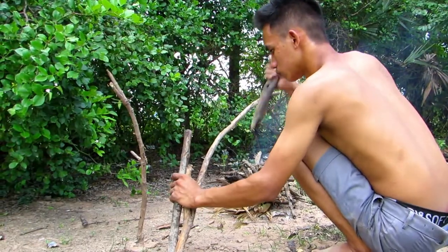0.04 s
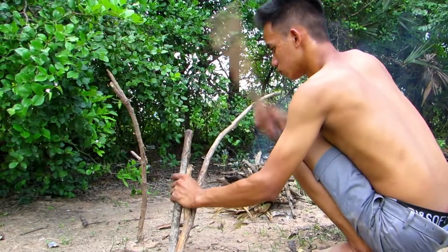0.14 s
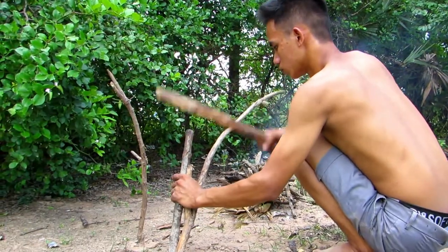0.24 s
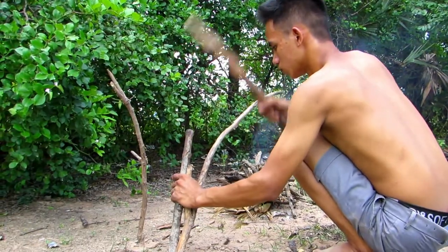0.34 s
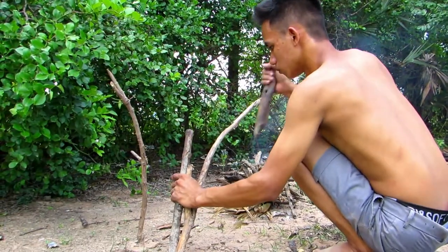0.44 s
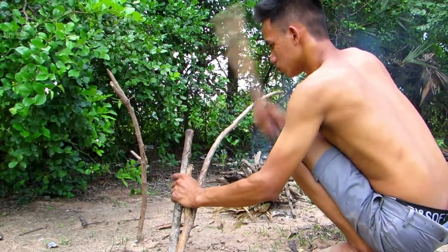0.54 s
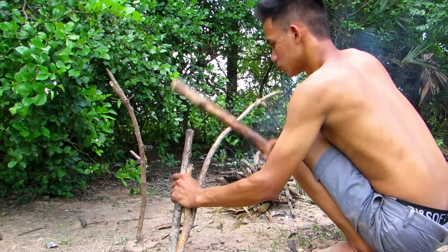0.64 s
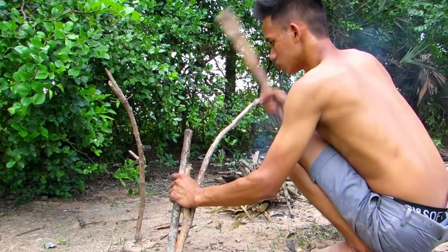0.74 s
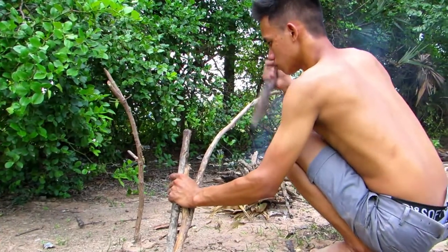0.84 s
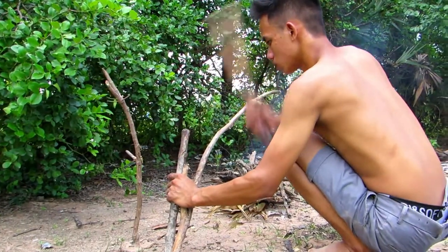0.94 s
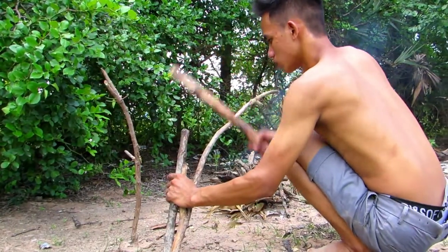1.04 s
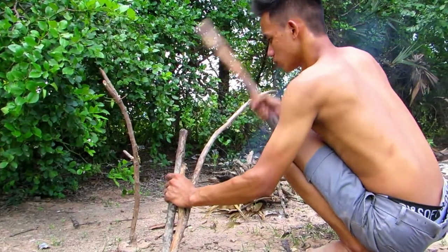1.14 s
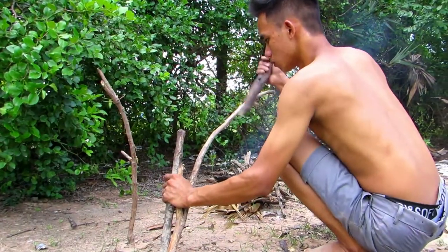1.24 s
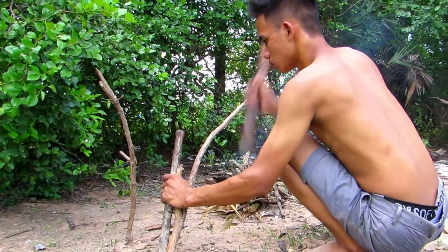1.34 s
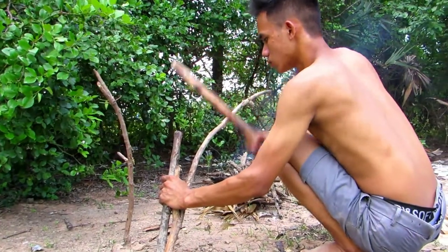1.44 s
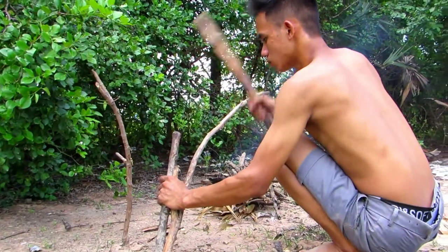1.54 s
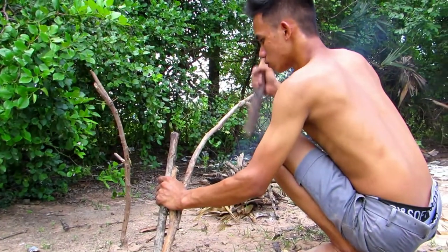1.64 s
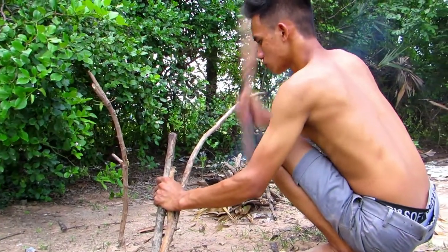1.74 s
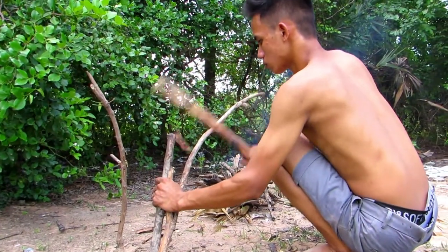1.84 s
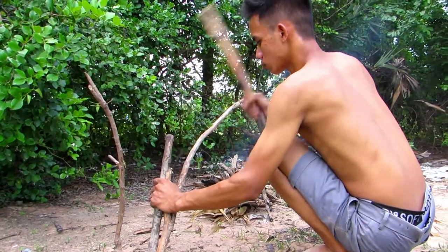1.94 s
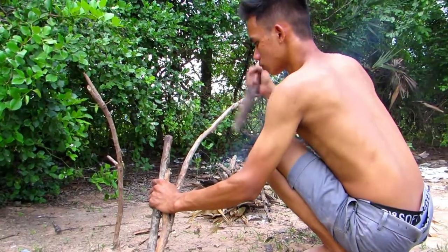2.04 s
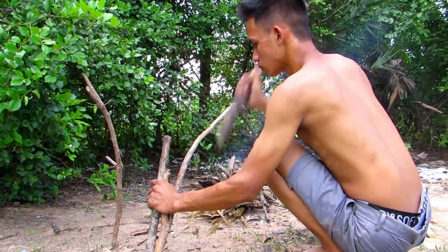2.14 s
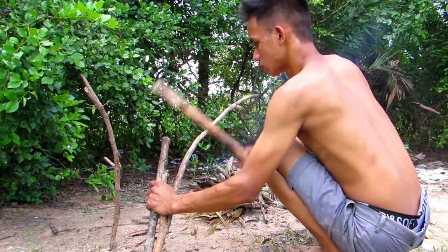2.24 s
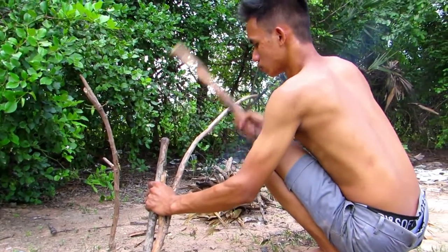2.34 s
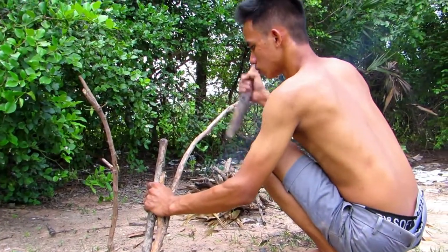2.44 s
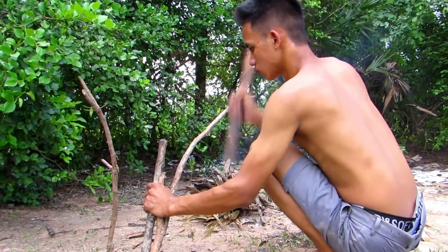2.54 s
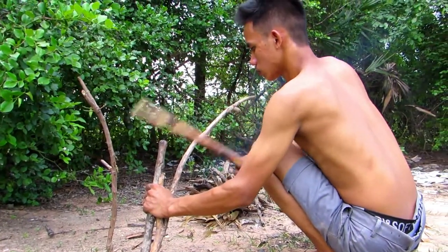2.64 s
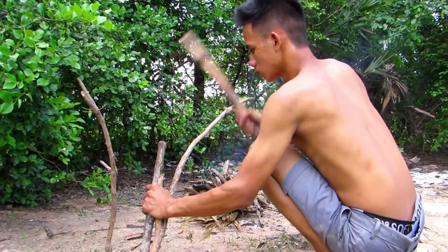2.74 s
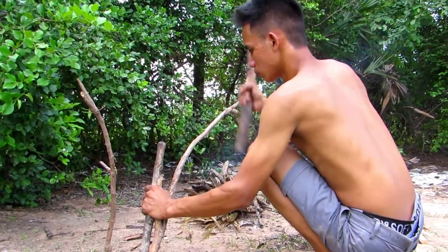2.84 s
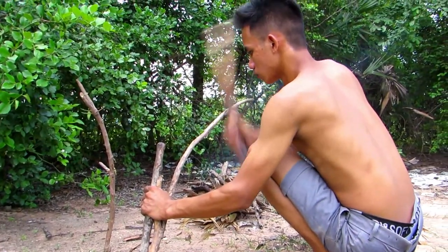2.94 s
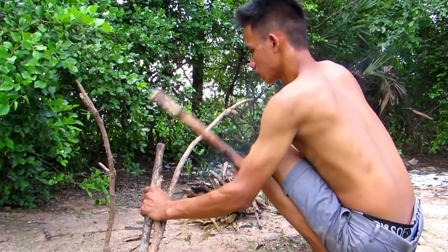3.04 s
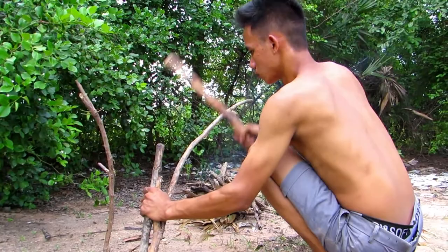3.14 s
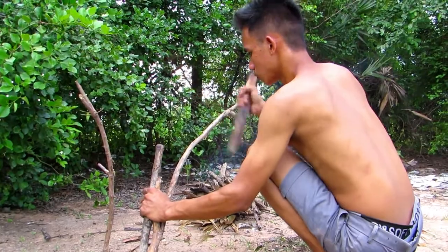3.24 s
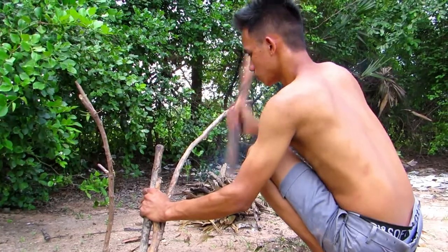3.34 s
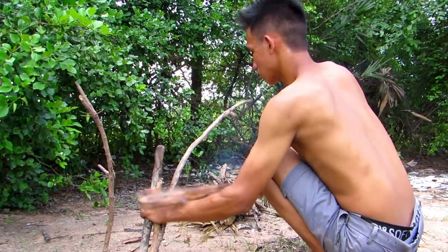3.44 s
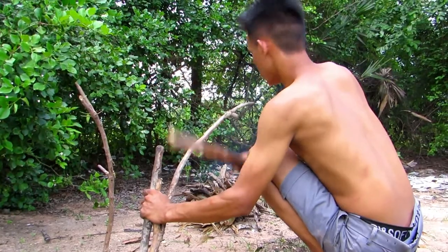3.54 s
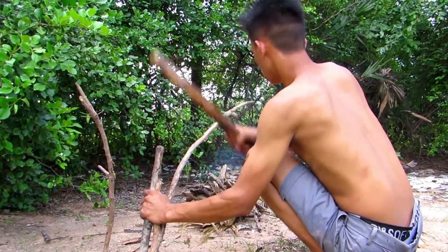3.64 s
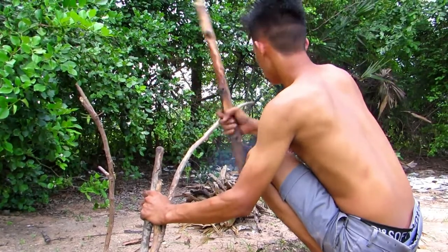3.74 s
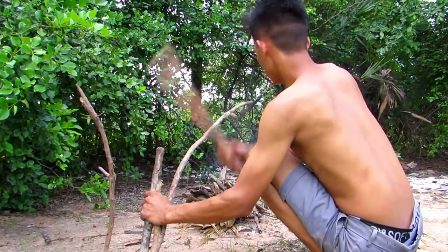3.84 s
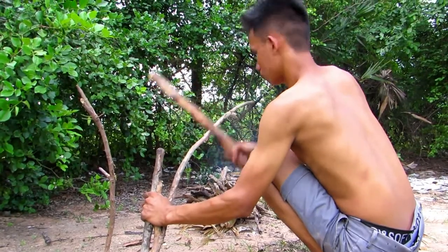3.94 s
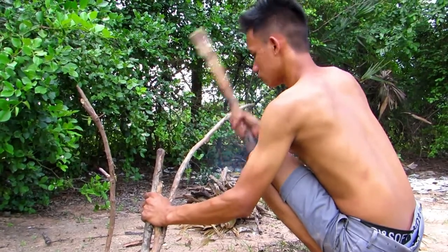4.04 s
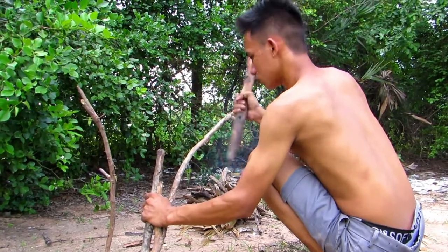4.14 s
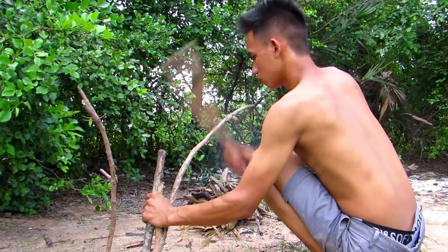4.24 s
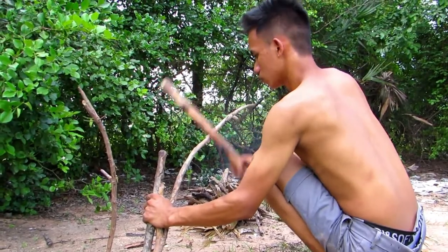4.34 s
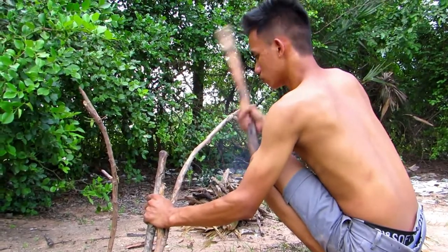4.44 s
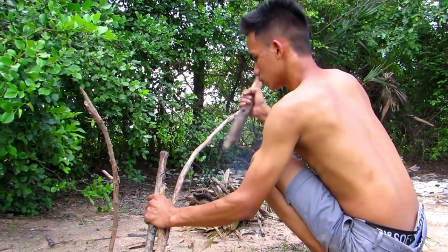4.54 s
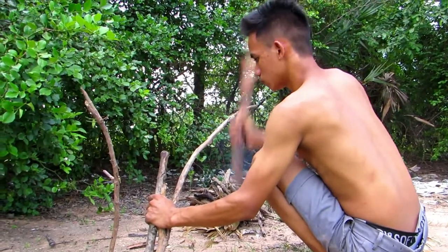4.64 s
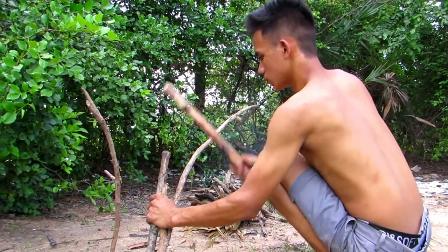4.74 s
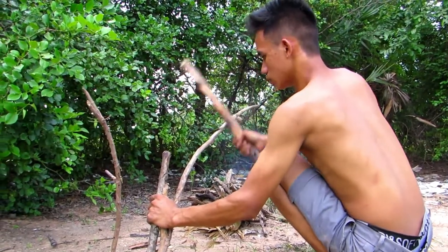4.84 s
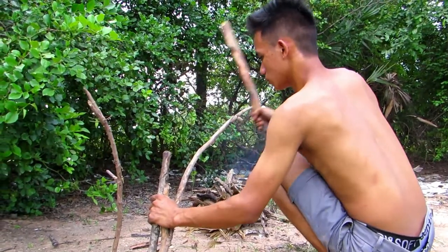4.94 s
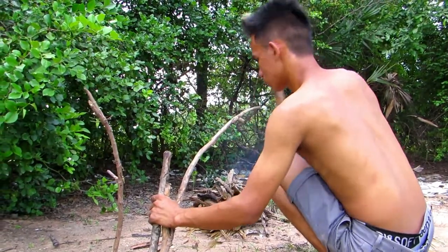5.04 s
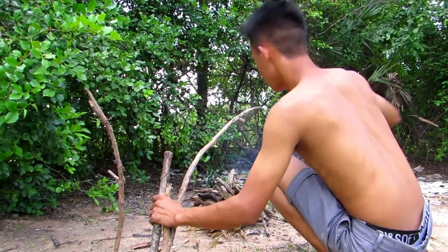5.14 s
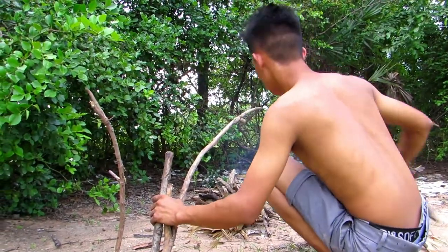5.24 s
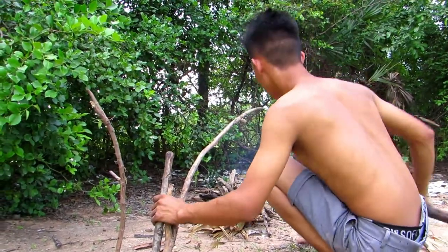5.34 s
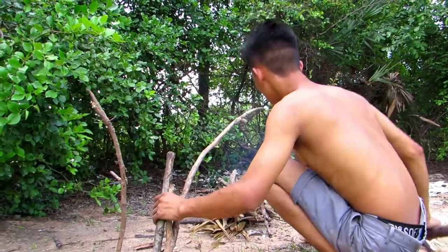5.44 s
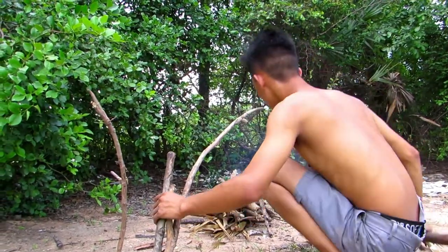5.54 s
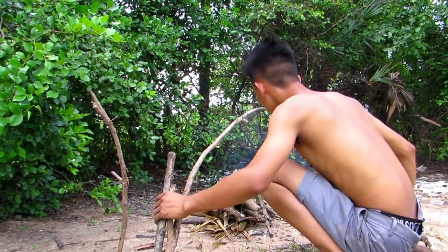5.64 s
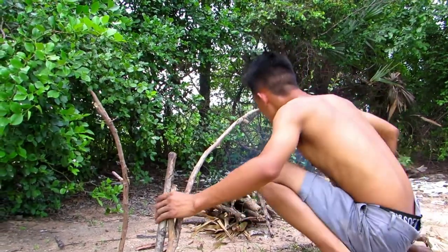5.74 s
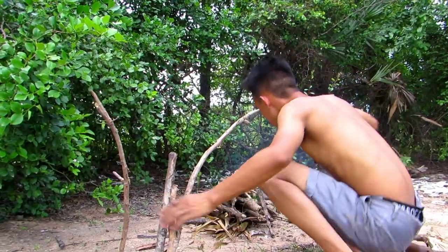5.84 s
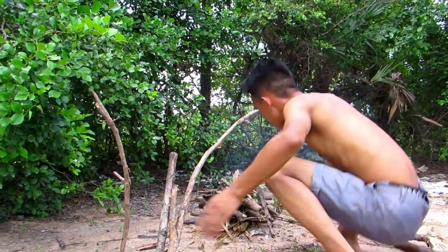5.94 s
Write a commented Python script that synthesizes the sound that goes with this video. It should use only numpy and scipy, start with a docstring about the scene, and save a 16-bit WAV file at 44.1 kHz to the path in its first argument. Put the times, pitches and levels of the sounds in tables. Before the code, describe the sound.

A stick pounds a wooden stake into packed dirt in twelve sharp, steady knocks, over low outdoor wind rumble and faint insects.

```python
"""Wind rumbles and now and then buffets the microphone, a faint hum fades and insects sing throughout.
From the start a stick drives a wooden stake into packed dirt: twelve knocks of contact noise and damped
modes, each scattered back by the bushes as noise and blurred notes. Then the stick drops and rings freely,
and feet bump the ground and stir dry litter. A limiter ducks everything after loud peaks.
"""
import sys
import numpy as np
from scipy import signal
from scipy.fft import rfft, irfft, next_fast_len
from scipy.io import wavfile
from scipy.ndimage import uniform_filter1d, minimum_filter1d

SR = 44100
rng = np.random.default_rng(int(sys.argv[2]) if len(sys.argv) > 2 else 0)


def waveform_to_disk(signal):
    """Save audio, clipped to [-1, 1], as 16-bit WAV at the path in sys.argv[1]."""
    frames = np.transpose(np.atleast_2d(signal))
    scaled = np.clip(frames, -1, 1) * 32767
    samples = np.round(scaled).astype(np.int16)
    wavfile.write(sys.argv[1], SR, samples)


N = 264159

# overall background swell: [t/s, level/dB]
BACKGROUND = [(0, 1), (1.4, 1.5), (2.7, 1), (3.5, -5), (4.2, -3), (5.0, -4), (5.99, -0.5)]
# colour of the low wind: [f/Hz, relative level/dB]
RUMBLE = [(22, -18.5), (33, -9), (45, 3), (65, -3.5), (90, -3.5), (125, -4.5), (170, -8), (240, -10.5),
          (340, -15), (500, -22.5), (900, -26), (4000, -76)]
# colour of the wash of leaves: [f/Hz, relative level/dB]
AIR = [(200, -29), (450, -6.5), (750, -7.5), (1200, 0.5), (1900, -2.5), (3750, -9.5), (3950, -16.5),
       (6500, -17), (8200, -25), (12000, -26), (14000, -42), (16000, -60)]
# colour of the rustling litter: [f/Hz, relative level/dB]
LITTER = [(2000, 1.5), (5000, 4), (8000, -1), (11000, -2.5), (13500, -10.5), (16000, -31)]
# left-right likeness of the background: [f/Hz, correlation -1..1]
LIKENESS = [(60, 0.91), (150, 0.97), (380, 0.23), (950, 0.19), (2400, 0.23), (10000, 0.13)]
# gusts that brush the microphone: [middle t/s, half-length/s, level/dB]
GUSTS = [(0.062, 0.066, -41), (2.84, 0.24, -25), (3.326, 0.18, -29), (4.19, 0.068, -21), (4.555, 0.13, -40),
         (5.006, 0.098, -42), (5.38, 0.054, -29), (5.468, 0.01, -13), (5.53, 0.17, -37)]
# colour of their buffeting: [f/Hz, relative level/dB]
BUFFET = [(20, -2), (65, -0.5), (100, -1), (170, -9.5), (300, -28.5), (600, -42), (3000, -100)]
# soft bumps on the ground: [t/s, relative level/dB]
BUMPS = [(5.634, -20), (5.812, -17.5)]
# dry twigs and grit: [t/s, level/dB, t60/s]
TWIGS = [(0.225, -29, 0.013), (2.352, -41, 0.02), (4.165, -47, 0.072), (4.583, -45.5, 0.053),
         (5.636, -37.5, 0.084), (5.812, -35, 0.03), (5.857, -44, 0.063)]
# colour of the twigs: [f/Hz, relative level/dB]
TWIG_COLOUR = [(300, 9.5), (1000, 5), (2500, 2.5), (5000, -5.5), (9000, -7.5), (13000, -12), (15500, -28)]
# landings of the dropped stick: [t/s, relative level/dB]
DROPS = [(5.432, -21), (5.4363, -35)]
# free modes of the dropped stick: [f/Hz, relative level/dB, t60/s]
STICK_MODES = [(1007, -4, 0.085), (1450, -19, 0.026), (2300, -5.5, 0.01), (2730, -4, 0.014),
               (3470, -7.5, 0.013), (5200, -13.5, 0.0076), (6200, -25, .013)]
# colour of what the bushes send back: [f/Hz, relative level/dB]
THICKET = [(150, 6.5), (400, 1), (750, -6.5), (1100, 2.5), (1400, -3), (1700, 2), (3200, -3.5), (4500, -9),
           (7000, -10.5), (10000, -18), (13000, -21.5), (15500, -60)]
# wood notes that stand out in the echo: [f/Hz, relative level/dB]
RETURNING_NOTES = [(1090, -36.5), (1700, -44.5)]
# blows: [t/s, force/dB re a typical blow, glance: 0 square on the head .. 1 skidding off its edge]
BLOWS = [(0.1542, -1, 0.19), (0.5751, 1.5, 0.044), (0.988, 2, 0.14), (1.3941, 2.5, 0.13), (1.798, 2.5, 0),
         (2.2064, 5, 0.023), (2.6064, 3, 0.077), (2.9979, 0.5, 0.08), (3.3977, -3.5, 0.93),
         (3.860, -3.5, 0.097), (4.2732, -2, 0.061), (4.6843, 0.5, 0.51)]
# the stake in the ground: [f/Hz, relative level/dB, t60/s]
THUD_MODES = [(201, -27, 0.11), (240, -11, 0.039), (334, 2.5, 0.017), (500, -12.5, 0.024)]
# the shaft held in the fist: [f/Hz, relative level/dB, t60/s]
KNOCK_MODES = [(751, -25, 0.028), (909, -9.5, 0.016)]
# lower bending modes of stick and stake: [f/Hz, relative level/dB, t60/s]
WOOD_MODES = [(1011, -15.5, 0.054), (1271, -9.5, 0.025), (1284, -5.5, 0.015), (1654, -5, 0.018),
              (1994, -6.5, 0.013), (2158, -19, 0.033)]
# upper bending modes, louder the harder the blow: [f/Hz, relative level/dB, t60/s]
CLACK_MODES = [(2366, -14, 0.02), (2918, -18, 0.021), (3140, -18.5, 0.033), (3617, -13, 0.019),
               (4310, -19, 0.017), (5380, -28, 0.0098), (6180, -35.5, 0.028), (6420, -27.5, 0.018),
               (7380, -42.5, 0.02)]
# colour of the splintery contact: [f/Hz, relative level/dB]
CRACK = [(400, -18.5), (1000, 7.5), (2500, -5), (4500, -4.5), (7000, -5), (10000, -12), (12500, -13),
         (14000, -30), (15500, -32)]
# how modes reach the two microphone ports: [f/Hz, left minus right level/dB]
BALANCE = [(200, 3), (330, -0.5), (550, 5.5), (880, 0.5), (1200, 4), (1400, 13), (1650, 6.5), (2200, -1.5),
           (5000, 9), (6500, 16.5)]
# the phase by which the left port leads: [f/Hz, phase/rad]
LEAD = [(200, 0.042), (450, 0.31), (700, -0.59), (1000, 0.22), (1350, 0.32), (1600, 0.2), (2500, -1.1),
        (3200, -0.15), (5500, 0.53), (7500, -0.32)]

# background layers where the swell is 0 (dB), and the dB they gain per dB of it
RUMBLE_DB, AIR_DB, LITTER_DB, CICADA_DB, CHORUS_DB = -35.5, -51.5, -65, -70.5, -65
RUMBLE_FOLLOWS, LITTER_FOLLOWS, INSECTS_FOLLOW = 1.7, 3.2, 1.5
# the cicada's note sags slowly; the crickets' band wanders by a fraction of its centre
CICADA_HZ, CICADA_SAG_HZ_PER_S = 6110, 11
CHORUS_HZ, CHORUS_WANDER = 9530, 0.0066
# the hum's upper harmonic: starting level, fade and resting level
HUM_DB, HUM_FADE_DB_PER_S, HUM_REST_DB = -56, 3, -72
# feet shifting on the litter
SHUFFLE_S, SHUFFLE_SPREAD_S, SHUFFLE_DB = 5.78, 0.18, -61.5
# mix of a square blow of typical force on the freshly set stake (relative dB)
THUD_DB, KNOCK_DB, WOOD_DB, CLACK_DB, CRACK_DB = 2, 8, 2.55, 2.0, 1.0
# dB gained per dB of force
CRACK_GROWTH, CLACK_GROWTH = 2.03, 0.65
# a glancing blow shoves less, shakes the shaft sideways, rings the lower bending modes less
# and tears more fibres (dB at full glance)
GLANCE_THUD_DB, GLANCE_KNOCK_DB, GLANCE_WOOD_DB, GLANCE_CRACK_DB = -10, 14, -3.5, 5.5
# the soil grips the sinking stake and quiets its shaft (dB lost per blow)
KNOCK_LOSS_DB, WOOD_LOSS_DB, CLACK_LOSS_DB = 1.52, 0.25, 0.34
CUTOFF_HZ = 16500


def from_db(db):
    """Decibels to gain."""
    return 10 ** (np.asarray(db) / 20)


def rms_one(x):
    """Scale to unit rms."""
    return x / np.sqrt(np.mean(x ** 2) + 1e-20)


def clock():
    """The time of every sample, in seconds."""
    return np.arange(N) / SR


def short_time():
    """The clock of one impact, a fifth of a second long."""
    return np.arange(SR // 5) / SR


def at_hz(points, hz):
    """Read a curve on a log-frequency axis."""
    points = np.array(points)
    return np.interp(np.log(hz + 1), np.log(points[:, 0]), points[:, 1])


def in_time(rows):
    """Join the rows of a curve by straight lines, one curve for each column after time."""
    s, *columns = np.transpose(rows)
    return [np.interp(clock(), s, column) for column in columns]


def drift(rate):
    """Random wandering: straight lines between unit-spread random knots, `rate` knots per second."""
    knots = rng.standard_normal(N)
    return np.interp(clock() * rate, np.arange(N), knots)


def swell(middle_s, half_s):
    """A smooth bell-shaped rise and fall of height 1."""
    return np.exp(-((clock() - middle_s) / half_s) ** 2)


def fade(t, t60):
    """A decay of 60 dB in t60 seconds."""
    return from_db(-60 * t / t60)


def tone(hz):
    """A sine of rms 1 that follows a pitch curve."""
    return np.sqrt(2) * np.sin(2 * np.pi * np.cumsum(hz) / SR)


def noise(spectrum, size, alike):
    """Stereo noise of a given colour and left-right likeness, rms 1, mixed from mid and side noise."""
    hz = np.fft.rfftfreq(size, 1 / SR)
    mid, side = rfft(rng.standard_normal((2, size)))
    alike = np.clip(alike, -1, 1)
    opposite = np.array([[1], [-1]])
    pair = np.sqrt(1 + alike) * mid + np.sqrt(1 - alike) * side * opposite
    colour = from_db(at_hz(spectrum, hz))
    return rms_one(irfft(pair * colour, size))


def pan(x, left_db):
    """Tilt a sound towards the left by a left-minus-right level difference."""
    return x * from_db(np.array([[left_db], [-left_db]]) / 2)


def add(out, s, sound):
    """Mix a sound in at time s."""
    start = int(round(s * SR))
    out[:, start:start + sound.shape[-1]] += sound[..., :N - start]


def ring(modes, t, vary, detune, sign=1):
    """Damped stereo modes struck once, with random strength and pitch; sign -1 alternates bending modes."""
    # axes: port, mode, time
    hz, db, t60 = np.transpose(modes)[:, :, None]
    strength, shift = rng.standard_normal((2, len(modes), 1))
    port = np.array([.5, -.5])[:, None, None]
    signs = sign ** np.arange(len(modes))[:, None]
    gain = from_db(db + port * at_hz(BALANCE, hz)) * np.exp(vary * strength) * signs
    phase = 2 * np.pi * hz * (1 + detune * shift) * t + port * at_hz(LEAD, hz)
    return np.sum(gain * fade(t, t60) * np.sin(phase), axis=1)


def far_hum(low_hz=246, low_db=10.5, wander=0.011):
    """A faint hum and its third harmonic waver together and fade to a faint rest."""
    level_db = np.maximum(HUM_DB - HUM_FADE_DB_PER_S * clock(), HUM_REST_DB)
    hz = low_hz * (1 + wander * drift(rate=42))
    low = from_db(low_db) * tone(hz)
    return from_db(level_db) * (low + tone(3 * hz))


def breeze(graininess=0.29):
    """Lumpy low wind, a soft wash of leaves and a grainy rustle of litter, stirred by wind and feet."""
    swell_db, = in_time(BACKGROUND)
    rumble = from_db(RUMBLE_DB + RUMBLE_FOLLOWS * swell_db)
    air = from_db(AIR_DB + swell_db)
    feet = from_db(SHUFFLE_DB) * swell(SHUFFLE_S, SHUFFLE_SPREAD_S)
    litter = from_db(LITTER_DB + LITTER_FOLLOWS * swell_db) + feet
    size = next_fast_len(N)
    alike = at_hz(LIKENESS, np.fft.rfftfreq(size, 1 / SR))
    lumps = from_db(1.2 * drift(rate=16))
    wind = rumble * lumps * noise(RUMBLE, size, alike)[:, :N]
    leaves = air * noise(AIR, size, alike)[:, :N]
    grains = np.exp(graininess * drift(rate=270))
    rustle = litter * grains * noise(LITTER, size, alike)[:, :N]
    return pan(wind, left_db=0.5) + pan(leaves + rustle, left_db=2.5)


def insects(jitter=0.0024, chorus_width_hz=260):
    """A far cicada holds one thin note; crickets chirr in a narrow band of noise above it."""
    swell_db = INSECTS_FOLLOW * in_time(BACKGROUND)[0]
    cicada_hz = CICADA_HZ - CICADA_SAG_HZ_PER_S * clock()
    cicada = from_db(CICADA_DB + swell_db) * tone(cicada_hz * (1 + jitter * drift(rate=220)))
    chorus_hz = CHORUS_HZ * (1 + CHORUS_WANDER * drift(rate=1.5))
    # low noise times a tone makes a band reaching chorus_width_hz to either side of it
    lowpass = signal.butter(2, chorus_width_hz, fs=SR, output="sos")
    crowd = signal.sosfilt(lowpass, rng.standard_normal((2, N)))
    chirr = from_db(1.8 * drift(rate=110))
    return cicada + from_db(CHORUS_DB + swell_db) * rms_one(crowd * chirr * tone(chorus_hz))


def gusts(opposed=0.963, left_db=1.5):
    """Eddies pass between the microphone's two ports, pushing one as they pull the other."""
    strength = sum(from_db(db) * swell(s, half_s) for s, half_s, db in GUSTS)
    buffeting = noise(BUFFET, next_fast_len(N), alike=-opposed)[:, :N]
    return pan(strength * buffeting, left_db)


def shuffling(bump_hz=112, bump_t60=0.028, press_s=0.0076):
    """Shifting weight bumps the ground as a short low sine; dry twigs and grit snap as bursts of noise."""
    out, t = np.zeros((2, N)), short_time()
    press = 2 * (1 - np.exp(-t / press_s))
    bump = press * fade(t, bump_t60) * np.sin(2 * np.pi * bump_hz * t)
    for s, db in BUMPS:
        add(out, s, from_db(db) * bump)
    for s, db, t60 in TWIGS:
        add(out, s, from_db(db) * fade(t, t60) * noise(TWIG_COLOUR, len(t), alike=0.51))
    return out


def dropped_stick(soft_hz=6000):
    """Let go, the stick lands on the dirt, which dulls the contact, and rings freely."""
    out, t = np.zeros((2, N)), short_time()
    for s, db in DROPS:
        clack = ring(STICK_MODES, t, vary=.05, detune=.002, sign=-1)
        add(out, s, pan(from_db(db) * clack, left_db=3.0))
    return signal.sosfilt(signal.butter(2, soft_hz, fs=SR, output="sos"), out)


def thicket(t, build_s=0.0029, depth_s=0.0399, t60=0.15, leaves_db=-37.0, glide_per_s=1.9,
            note_width_s=0.011):
    """Leaves scatter a knock back evenly until their depth is used up; wood notes return blurred, bending up."""
    build = 1 - np.exp(-t / build_s)
    scatter = build * fade(np.maximum(t - depth_s, 0), t60)
    out = from_db(leaves_db) * scatter * noise(THICKET, len(t), alike=0.51)
    # pitch rises by this fraction per second, then holds 10 ms past the full depth
    bend = 1 + glide_per_s * np.minimum(t - depth_s, .01)
    envelope = np.exp(-np.abs(t - depth_s) / note_width_s)
    for hz, db in RETURNING_NOTES:
        # many paths of unequal length smear each note
        blur = .035 * drift(rate=300)[:len(t)]
        cycles = np.cumsum(hz * (bend + blur)) / SR + rng.random()
        out = out + from_db(db) * envelope * np.sin(2 * np.pi * cycles)
    return out


def pounding(force_db=6.0, snap_db=-9.0, snap_t60=0.0037, crack_db=-20.5, crack_t60=0.039, radiate_hz=140):
    """Each blow cracks at the contact, rings the wood and shoves the stake deeper into the soil."""
    out, t = np.zeros((2, N)), short_time()
    # a hard snap at first touch, then fibres crushing
    crush = from_db(snap_db) * fade(t, snap_t60) + from_db(crack_db) * fade(t, crack_t60)
    for sunk, (s, force, glance) in enumerate(BLOWS):
        # levels in dB; sunk counts the blows already struck
        thud = THUD_DB + force + GLANCE_THUD_DB * glance
        knock = KNOCK_DB + force + GLANCE_KNOCK_DB * glance - KNOCK_LOSS_DB * sunk
        wood = WOOD_DB + force - WOOD_LOSS_DB * sunk
        clack = CLACK_DB + CLACK_GROWTH * force - CLACK_LOSS_DB * sunk
        crack = CRACK_DB + CRACK_GROWTH * force + GLANCE_CRACK_DB * glance

        shove = from_db(thud) * ring(THUD_MODES, t, vary=.04, detune=.01)
        shaft = from_db(knock) * ring(KNOCK_MODES, t, vary=.06, detune=.015)
        lower_gain = from_db(wood + GLANCE_WOOD_DB * glance)
        lower = lower_gain * ring(WOOD_MODES, t, vary=.15, detune=.012, sign=-1)
        upper = from_db(clack) * ring(CLACK_MODES, t, vary=.22, detune=.018, sign=-1)
        contact = pan(from_db(crack) * crush * noise(CRACK, len(t), alike=.7), left_db=1.5)
        echo = from_db(wood) * thicket(t)
        add(out, s, shove + shaft + lower + upper + contact + echo)
    # a thin stake radiates little bass
    highpass = signal.butter(2, radiate_hz, "high", fs=SR, output="sos")
    return from_db(force_db) * signal.sosfilt(highpass, out)


def scene():
    """Everything that sounds at the edge of the thicket, background first."""
    background = far_hum() + breeze() + insects() + gusts()
    return background + shuffling() + dropped_stick() + pounding()


def limiter(x, threshold_db=3, recover_db_per_s=24.0):
    """The gain drops just ahead of a peak above the threshold and creeps back up."""
    peak_db = 20 * np.log10(np.abs(x).max(axis=0) + 1e-9)
    over = np.maximum(peak_db - threshold_db, 0)
    # adding a ramp before the running maximum makes the hold fall steadily afterwards
    ramp = recover_db_per_s * clock()
    held = np.maximum.accumulate(over + ramp) - ramp
    # sizes in samples: look around for the lowest gain, then smooth it
    gain_db = uniform_filter1d(minimum_filter1d(-held, size=256), size=128)
    return x * from_db(gain_db)


def record(dry):
    """Limit, round off the peaks near full scale and cut off the top."""
    held = limiter(dry)
    clipped = held / (1 + held ** 6) ** (1 / 6)
    return signal.sosfilt(signal.cheby2(12, 60, CUTOFF_HZ, fs=SR, output="sos"), clipped)


dry = scene()
out = record(dry)
waveform_to_disk(out)
```